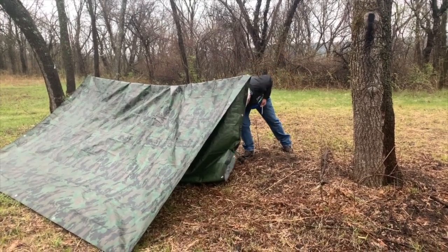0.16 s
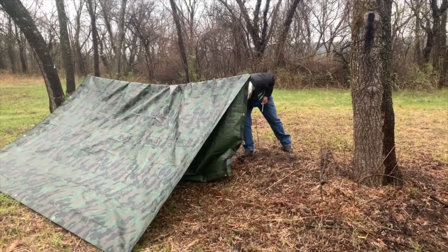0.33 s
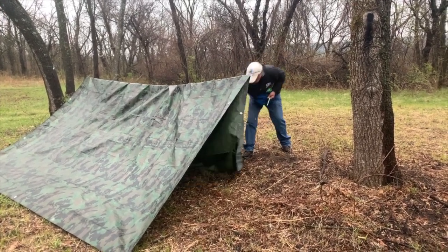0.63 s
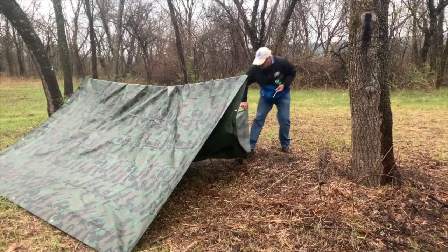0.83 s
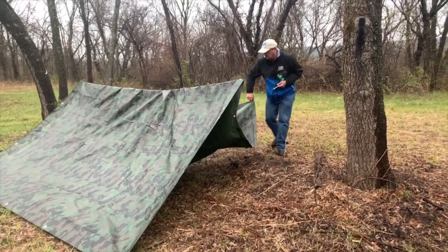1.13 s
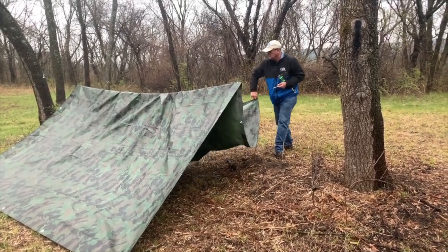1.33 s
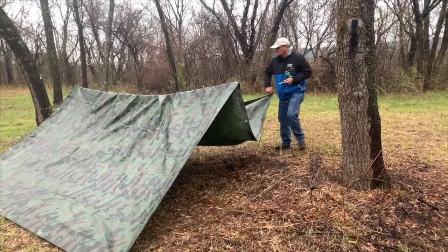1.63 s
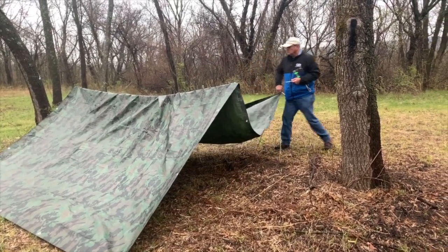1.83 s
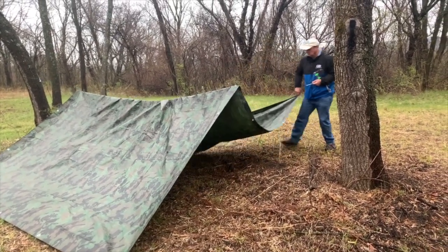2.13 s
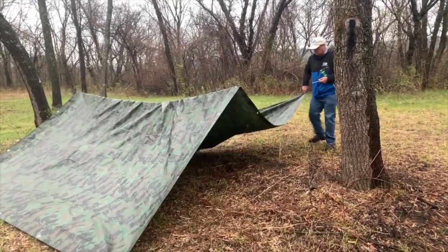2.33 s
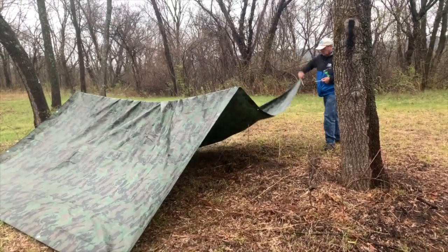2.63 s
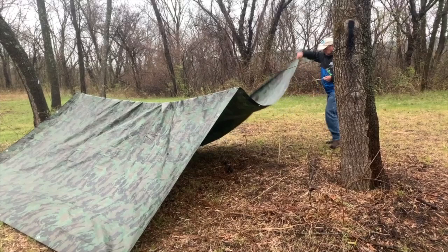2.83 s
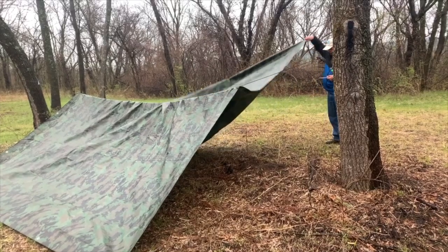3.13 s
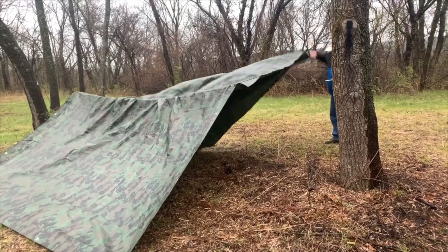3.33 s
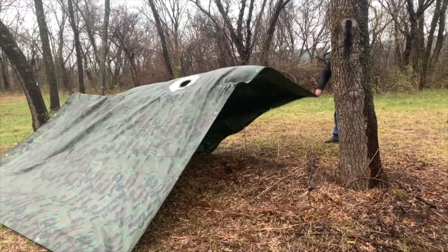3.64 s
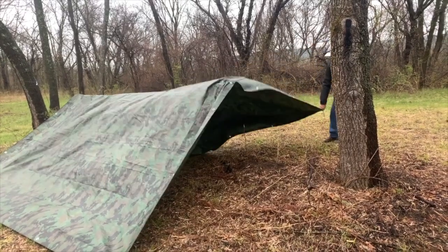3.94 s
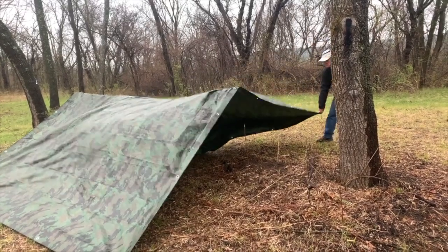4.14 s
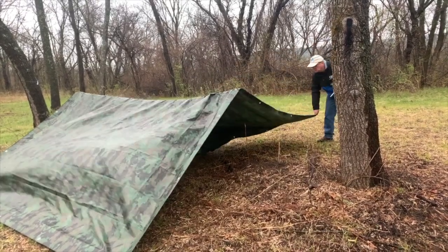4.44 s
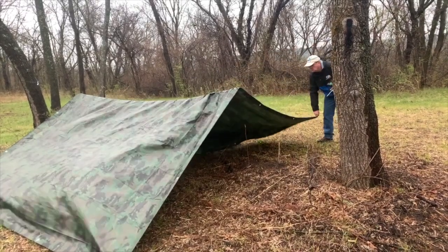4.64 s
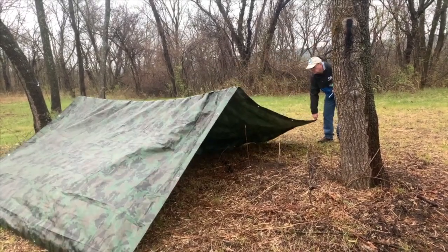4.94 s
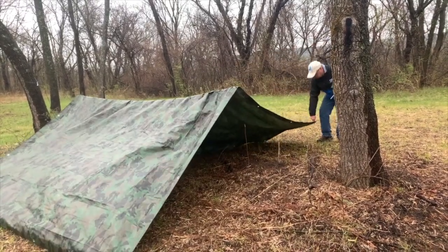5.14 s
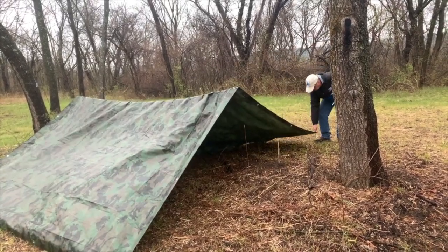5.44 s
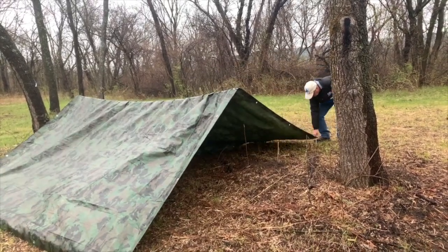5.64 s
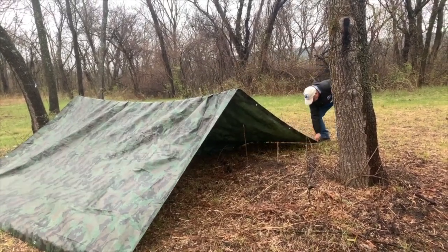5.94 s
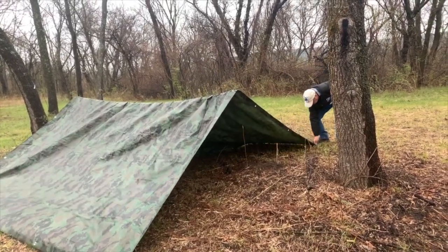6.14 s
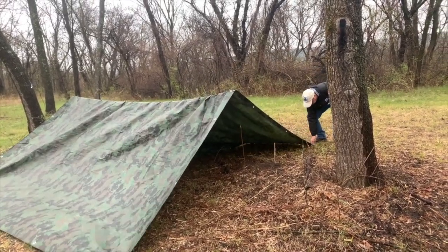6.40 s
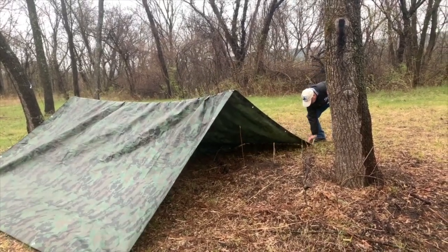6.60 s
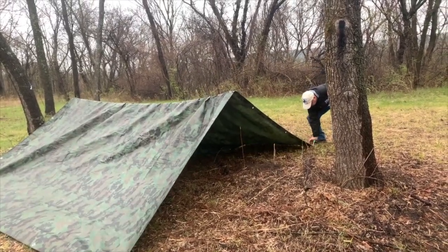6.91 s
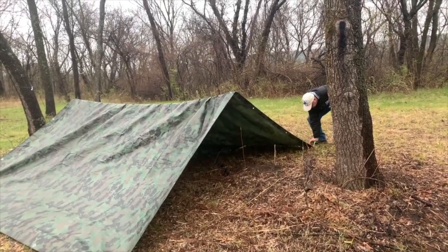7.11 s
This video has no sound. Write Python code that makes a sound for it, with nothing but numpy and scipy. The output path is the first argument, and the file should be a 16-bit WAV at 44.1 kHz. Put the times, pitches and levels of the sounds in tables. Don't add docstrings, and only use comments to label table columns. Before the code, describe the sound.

A woven plastic tarp crinkles and rustles outdoors as it is pulled and shaken, snaps hard once, then settles into faint crackles.

```python
import sys
import numpy as np
from scipy import signal
from scipy.fft import rfft, irfft, next_fast_len
from scipy.io import wavfile
from scipy.ndimage import uniform_filter1d, map_coordinates

SR = 44100
rng = np.random.default_rng(int(sys.argv[2]) if len(sys.argv) > 2 else 0)


def magnitude_from_level(level_db):
    exponent = np.asarray(level_db, float) / 20
    return 10 ** exponent


def unload_wav(signal):
    wavfile.write(
        sys.argv[1],
        SR,
        np.round(np.clip(np.atleast_2d(signal).T, -1, 1) * 32767).astype(np.int16),
    )


N = 320459

# (time [s], crease level [dB])
PULL = [(.09, -66), (.2, -57), (.42, -48), (1.3, -48.5), (1.6, -45.5), (2.27, -46.5), (2.43, -54),
        (2.66, -52), (2.72, -47), (3.2, -47.5), (3.95, -49), (4.3, -45), (4.68, -44.5), (4.8, -52.5),
        (5.26, -64), (6, -60.5), (6.5, -57.5), (7.27, -73.5)]
# (peak time [s], level [dB], rise [s], fall [s])
TUGS = [(.115, 12, 0.01, 0.069), (.255, 11, 0.054, 0.054), (.34, 6, 0.0088, 0.022), (.385, -3, .03, 0.0079),
        (.5, 5, 0.006, 0.09), (.58, 3, 0.022, 0.059), (.73, 4, 0.024, 0.1), (.89, 4, 0.016, 0.23),
        (1.23, -3.5, 0.079, 0.058), (1.38, 3, 0.012, 0.24), (1.88, -3, 0.2, 0.084), (2.0, 6, 0.086, 0.055),
        (2.33, 3, 0.038, 0.043), (2.47, 5, 0.03, 0.15), (3.27, 3, 0.038, 0.087), (3.38, 6, 0.16, 0.09),
        (3.48, 3, 0.03, 0.034), (3.575, 3, 0.022, .015), (3.535, 12.5, 0.18, 0.1),
        (3.79, 2.5, 0.049, 0.046), (4.17, 4.5, 0.11, 0.26), (4.71, 6, 0.041, 0.08),
        (4.918, 6, 0.0024, 0.0092), (4.905, -2.5, 0.023, 0.0057), (5.467, 5, 0.049, 0.075),
        (5.458, -2.5, 0.017, 0.0062), (5.7, 5.5, 0.34, 0.26), (6.15, 7, 0.037, 0.19),
        (6.29, 5, 0.076, 0.051), (6.36, 11.5, 0.1, 0.11), (6.33, 3.5, 0.032, 0.026),
        (6.385, 5, 0.042, 0.038), (6.47, 2, 0.045, 0.044), (6.79, -5.5, 0.27, 0.23),
        (6.75, 4.5, 0.058, 0.063), (6.85, 3.5, 0.04, 0.024), (6.975, 2, 0.077, 0.052)]
# (peak time [s], level [dB], rise [s], fall [s])
SLIDES = [(.08, 5.5, .03, 0.098), (.19, 5.5, 0.083, 0.049), (.25, 2.5, .03, 0.043), (.34, 1, .02, 0.051),
          (.68, -1.5, 0.045, .05), (1.76, -5, 0.12, 0.093), (2.45, 2, 0.052, 0.091),
          (2.88, -2, 0.031, 0.039), (3.26, -4.5, 0.27, 0.056), (3.37, 6, 0.063, 0.12),
          (3.5, 7.5, 0.08, 0.14), (4.6, 1, 0.053, 0.087), (4.75, 7, 0.053, 0.052), (4.88, 2, 0.052, 0.024),
          (5.57, -4, 0.051, 0.046), (6.28, 0.5, 0.057, 0.051), (6.37, 3, 0.043, 0.045),
          (6.45, 3, 0.082, 0.049), (6.9, -4, 0.084, 0.035)]
# (time [s], finest creases facing the microphone [dB], large loose panels [dB],
# taut ridge [dB])
FACING = [(0, 8, 1, 2), (.7, 2, -3, 0), (1.3, 4, -4, 0.5), (1.7, -0.5, -3, 0.5), (2.2, 0.8, 0, 4),
          (3, -1, 0, 2), (3.5, -2, 3, 2), (3.9, -0.5, 2.5, 0.5), (4.2, -1.5, 1.5, 0), (4.6, -4, -4, -2),
          (4.9, -3, 0.5, .1), (5.3, 1.5, 1, -2), (6, 4, 1.5, -2.5), (6.4, 3, -4, -5.5),
          (6.8, -3.5, 4.5, 1.5), (7.27, -3, 6, -1)]
# (centre [Hz], t60 [s], scatter of its own size [dB], trim [dB])
CREASE_SIZES = [
    (273.3, 0.044, 4.5, 0),
    (713, 0.033, 8, 1),
    (1150, 0.0064, 3, -1),
    (1906, 0.035, 6, 0.5),
    (4150, 0.0092, 3.5, 0),
    (7590, 0.029, 4, 2),
    (10730, 0.02, 6, 0),
]
# (level [dB], share of a tug missed [0-1], share of facing, share of looseness, share of sliding)
DRUM = (-7, 0.65, 0.19, 0, 0.42)
CRISP = (-11.5, 0.42, 0.24, -0.35, 1.38)
FIZZ = (-13, 0.45, .5, 0.07, 1.14)
# (frequency [Hz], density [dB per Hz])
SHEET = [(76, -33), (130, -1.5), (266, -1), (470, -11.5), (696, -4), (797, -4), (1450, -3), (1770, -2),
         (2140, -4.5), (2920, -13), (3300, -48), (4290, -47), (7260, -120)]
# (frequency [Hz], density [dB per Hz])
BRIGHT = [(1590, -30), (2700, 5), (3130, -5), (4750, -1.5), (6080, -13.5), (7430, -5.5), (9090, -12.5),
          (10900, -6.5), (12100, -13), (13300, -16), (15200, -18.5), (16000, -30)]
# (time [s], peak [dB],
# panel body re peak [dB], thin tick re peak [dB])
SHAKEN = [(0.0456, -44.5, 2, -5), (0.393, -41.5, 9, -5), (.4539, -33, -17, -23), (0.4965, -36, -3, -15),
          (0.9017, -36, -12, -24), (0.985, -30, -13, -31), (1.293, -42.5, 13, -2), (1.318, -42, -14, 2),
          (1.491, -35, 0, -15), (2.208, -31, -5, -20), (2.329, -33, -14, -15), (2.647, -50, 9, 2),
          (2.6721, -33.5, 2, -15), (2.7082, -32.5, -2, -11), (2.892, -36, 6.5, -10), (3.042, -32, -7, -25),
          (3.161, -36, 3, -12), (3.364, -33, 5, -7), (3.4971, -27, 1, -22), (3.738, -34, -10, -13),
          (4.133, -31, -9, -18), (4.326, -34, -15.5, -3), (4.492, -37, -16, -8), (4.4999, -38, -12, -3),
          (4.512, -44, -11, 0), (4.565, -33, 0, -14), (4.6659, -34, 0, -16), (4.702, -33, 6, -21),
          (4.7255, -22, 0, -19), (4.775, -35, 1, -10)]
PEGGED = [(4.863, -39.5, 2, -19.5), (4.9158, -45.5, -7, 0), (5.008, -49.5, -8, 1), (5.0258, -43, 0, -14),
          (5.0943, -56, -5, -7), (5.1147, -51.5, 5, -6), (5.3707, -51, 5, -12), (5.436, -48, 8, -20),
          (5.4652, -50, 2, -15), (5.4983, -47.5, 8, -20), (5.6173, -41, -10, -22), (5.644, -43, 4, -13),
          (5.6831, -36, -5, -12), (5.6998, -38.5, 3.5, -14), (5.891, -45, -14, -9), (5.9454, -43, 3, -12),
          (6.02, -51, 0, -13), (6.0965, -43, -8.5, -15), (6.111, -46, -10, -9), (6.1389, -40, 4, -7),
          (6.1909, -42, 5, -12), (6.23, -47, 4, -14), (6.3512, -42, 0, -6), (6.519, -47, -9, -12),
          (6.537, -39, -6, -22), (6.5895, -53, -4, -13), (6.6422, -41.5, -10, -26), (6.7436, -49, 0, -10),
          (6.9523, -49, -13.5, -11), (7.047, -54.5, 5.5, -10)]
FURTHER_SNAPS = [(0.11, -52, 1, -8), (0.335, -41, 6, -15), (1.373, -45, -8, 1), (2.141, -40.5, 8, -16),
                 (4.421, -37, -8, -16), (4.545, -46, -10, -16), (4.58, -30, -6, -14), (4.63, -42, -6, -15),
                 (4.75, -34.5, 4, -18), (5.0539, -48, 2, -15), (6.0648, -53, 0, -14), (6.834, -55, 6, -10),
                 (6.917, -54, 3, -10), (6.975, -48.5, 3.5, -16), (7.21, -54, -3, -10), (2.927, -39, -4, -10),
                 (3.059, -42, -8, -10), (3.2004, -43, -6, -4), (3.2606, -40, 4, -8), (4.453, -41, -8, -4),
                 (4.5205, -48, -8, -6)]
# (time [s], peak [dB], pitch [Hz])
KNOCKS = [(.108, -45, 2060), (.249, -27, 1350), (.336, -30.5, 2000), (.392, -30, 1850), (.4985, -28, 1320),
          (.717, -33, 1250), (.4985, -35, 1004), (1.116, -30, 1960), (1.154, -34, 1150), (1.234, -30, 1690),
          (1.373, -31, 2070), (1.989, -33, 1210), (4.732, -20, 1550), (2.244, -33, 1870),
          (2.454, -46, 1793), (3.739, -34, 1150), (3.759, -35, 1994), (4.467, -30, 1634),
          (4.701, -32, 1750), (4.709, -24, 1760), (4.721, -24, 1643), (4.728, -30, 1600),
          (4.917, -31.5, 1720), (6.14, -34, 2180), (6.191, -30.5, 1380), (6.357, -25, 1680),
          (6.465, -33.5, 1512), (6.744, -44, 1460), (6.834, -46, 1455), (6.975, -48, 1796)]
# (time [s], peak [dB], pitch [Hz])
BOOMS = [(3.279, -39, 660), (3.307, -37, 713), (3.332, -35, 788), (3.412, -35, 639), (3.476, -30, 1696),
         (3.482, -26.5, 694), (3.521, -26, 1800), (3.522, -34, 760), (3.535, -36, 696), (3.553, -27, 670),
         (3.568, -29, 735), (3.573, -31, 1640), (3.444, -29, 1890), (2.141, -30.5, 1094)]
# (time [s], peak [dB], pitch [Hz], ring [cycles])
WHUMPS = [
    (3.545, -32, 255, 5),
    (3.581, -41, 62, 6),
    (4.7025, -30, 235, 7),
    (4.72, -36, 290, 7),
    (4.709, -38, 400, 8),
    (4.745, -36, 58, 6),
    (6.144, -42, 72, 5),
    (6.194, -43, 90, 3),
    (.339, -40, 90, 4),
]
# (time [s], peak [dB], pitch [Hz])
FLICKS = [(0.0064, -58, 11100), (0.0458, -44, 5300), (0.2488, -45, 10800), (0.3915, -42, 5640),
          (1.2923, -33, 9830), (1.641, -38, 7570), (1.9589, -44, 7300), (2.209, -35, 8870),
          (2.5207, -40, 7340), (2.672, -34, 11000), (2.7096, -39, 7670), (2.823, -46, 7400),
          (2.8584, -44, 7310), (2.8913, -37, 11360), (2.9572, -51, 7380), (3.3513, -34, 7070),
          (3.4043, -32, 7450), (4.1023, -51, 5580), (4.115, -44, 5520), (4.3031, -35, 7660),
          (4.3266, -34, 7500), (4.4533, -40, 7120), (4.501, -27, 7500), (4.5136, -40, 7900),
          (4.574, -28, 7380), (4.581, -34, 7590), (4.6137, -45, 7720), (4.6259, -34, 7400),
          (4.6794, -35, 8110), (4.7255, -30, 8030), (4.8053, -41, 7780), (4.8363, -53, 7400),
          (4.9024, -58, 5370), (4.9157, -43, 10950), (4.9938, -57, 7570), (5.228, -61, 7380),
          (5.391, -53, 7560), (5.4873, -52, 7050), (5.5992, -56, 7440), (5.7563, -55, 5250),
          (5.8092, -55, 7540), (5.8474, -46, 7750), (6.0348, -51, 7150), (6.096, -51, 7340),
          (6.1384, -41, 8100), (6.1617, -51, 7930), (6.1898, -51, 8070), (6.2114, -48, 7520),
          (6.2811, -49, 7460), (6.3024, -50, 8400), (6.4074, -44, 7630), (6.4793, -45, 8190),
          (6.4971, -54, 8680), (6.5196, -51, 5420), (6.5906, -46, 11160), (5.466, -47, 7500)]
# (time [s], peak [dB], pitch [Hz])
DENTS = [(0.4539, -49, 2660), (0.9018, -42, 4500), (0.985, -39, 2680), (2.33, -35.5, 4330),
         (2.824, -41, 4800), (3.043, -39, 2700), (4.4923, -36, 2748), (4.564, -35, 2580),
         (4.8635, -53, 4766), (5.026, -48, 3093), (5.0544, -51, 2690), (5.1158, -58, 2653),
         (5.227, -58, 4284), (5.37, -58, 4160), (5.437, -59, 2600), (5.4959, -56, 3050),
         (5.6173, -50, 4400), (5.683, -47, 2606), (5.7562, -60, 2570), (5.891, -50, 4520),
         (6.0654, -56, 4466), (6.096, -54, 3560), (6.112, -50, 3890), (6.1384, -38.5, 4270),
         (6.19, -44, 4060), (6.2101, -47, 3507), (6.3063, -49, 2627), (6.3562, -38, 4150),
         (6.3742, -40, 2636), (6.4074, -48, 4360), (6.5385, -51, 3880), (6.6421, -64, 2668),
         (6.9533, -54, 4360)]
SPECK_HZ = [3300, 4360, 4800, 7400, 8300, 10800]
# (frequency [Hz], change of colour [dB])
FOLDED = [(1200, 1.5), (1600, -3.5), (2000, 1.5), (4700, -0.5), (5700, 4), (7000, -0.5)]
LIFTED = [(250, 1), (360, 1.5), (480, -2), (700, 3), (1300, 2), (1550, -3.5), (1900, 2.5), (2300, -1),
          (2800, -1), (3300, 0.5)]
LOWERED = [(5000, 0.5), (6100, -1), (7300, 4), (8700, 6.5), (10000, 3), (11000, -1.5), (12200, 2),
           (13300, 7), (15500, 3)]
# (time [s], folded [0-1], lifted [0-1], lowered [0-1])
POSTURE = [(0, 1, 0.1, 0), (.6, 0.7, 0.25, 0.2), (1.2, 0.22, 1, 0.1), (2, 0, 0.86, 0.01),
           (3.1, 0.1, 0.92, 0), (3.5, 0.02, 0.19, 0), (4.8, 0.06, 0, 0.13), (5.6, 0, 0.38, 0.36),
           (6.1, 0, 0, 1), (6.5, 0, 0, 0.88), (7.27, 0, 0, 0.54)]
# (peak time [s], level [dB], rise [s], fall [s])
GUSTS = [(.05, 9, 0.2, 0.14), (.34, 3, 0.066, 0.22), (2.2, 2.5, 1.8, 0.037), (3.58, 7, 0.29, 0.23),
         (4.31, 12.5, 0.83, 0.17), (4.74, 13, 0.19, 0.13), (5.14, 4, 0.2, 0.091), (5.36, -3, 0.23, 0.095),
         (5.63, 13, 0.12, 0.18), (5.97, -8, 0.11, 0.12), (6.17, 8, 0.17, 0.096)]
# (peak time [s], level [dB], rise [s], fall [s])
TRAFFIC = [
    (5.65, 0.5, 0.57, 0.38),
    (6.9, 1.5, 0.43, 0.52),
]
# (frequency [Hz], density [dB per Hz])
BUFFET = [(11, -51), (18, -5.5), (38, 2.5), (65, 0.5), (84, -29), (140, -120)]
RUMBLE = [(32, -29), (55, -3), (81, -1), (107, -7.5), (133, -7), (178, -20), (200, -14), (260, -28),
          (440, -120)]
WOOD = [(88, -27), (150, -3), (190, -16), (315, -12), (524, -21.5), (837, -35.5), (1290, -24.5),
        (1720, -35), (2920, -39.5), (6020, -51), (7470, -42), (13700, -68), (16000, -51)]

BRIGHT_DB = -10
FLAP_DB, FLAP_RISE_S, FLAP_FALL_S = 40.5, 0.027, 0.098
STRAYS_PER_S, STRAY_DB, STRAY_SCATTER_DB, STRAY_COLOUR_DB = 30, 3, 3.5, 5
SPECKS_PER_S, SPECK_DB, SPECK_SCATTER_DB = 60, -3, 1
TICK_TILT_DB, TICK_LEAN, TICK_USUAL_DB = 1.5, .25, -4
BUFFET_DB, RUMBLE_DB, WOOD_DB = -57, -54, -63
RUMBLE_SHARE = 0.16
TOP_HZ = 15830


def creases(rate, thinning, spread_db, biggest_db, clump_db, hiss_db):
    crease_db, drum_db, crisp_db, fizz_db = handling()
    busy = np.clip(magnitude_from_level(thinning * (crease_db + 47)), .05, 3)
    draws = rng.random((30000, 2))
    own = np.clip(rng.standard_normal((len(draws), len(CREASE_SIZES))), -2, 2)
    expected = np.cumsum(rate * busy / SR)
    at = np.searchsorted(expected, np.cumsum(-np.log(draws[:, 0])))
    live = at < N
    size_db = biggest_db * np.tanh(-spread_db * np.log(draws[:, 1]) / biggest_db)
    gaps = 1 + 2.0 * np.clip(1 - busy, 0, 1)
    clumps = clump_db * (wobble(23) + wobble(45)) * gaps

    layers = []
    for k, (hz, t60, own_db, trim_db) in enumerate(CREASE_SIZES):
        sharp = np.clip(np.log(hz / 150) / 4, 0, 1)
        event_db = sharp * size_db + own_db * own[:, k]
        power = np.bincount(at[live], magnitude_from_level(2 * event_db)[live], N)
        swell = dying(power, t60 / 2) / busy
        swell = np.sqrt(swell / swell.mean() + magnitude_from_level(2 * hiss_db))
        swell = swell * magnitude_from_level(sharp * clumps + 0.59 * wobble(30))
        bursts = steady(swell, 0.16) * rng.standard_normal(N)
        layers.append(magnitude_from_level(trim_db) * coloured(bursts, slice_db(k)))

    finest_db, loose_db, taut_db = curves(FACING)
    layers[1] = layers[1] * magnitude_from_level(loose_db)
    layers[3] = layers[3] * magnitude_from_level(taut_db)
    layers[6] = layers[6] * magnitude_from_level(finest_db)
    drum = steady(layers[0], .3)
    body = steady(sum(layers[1:4]), .3)
    crisp = steady(layers[4], .3)
    fizz = steady(sum(layers[5:7]), .3)
    mix = body + magnitude_from_level(drum_db) * drum + magnitude_from_level(crisp_db - 1.1) * crisp + magnitude_from_level(fizz_db - 0.74) * fizz
    return magnitude_from_level(crease_db - 0.65) * mix


def handling():
    pull_db, = curves(PULL)
    tug_db = swells(TUGS)
    slide_db = swells(SLIDES)
    finest_db, loose_db, _ = curves(FACING)
    flaps = [(s, max(db + FLAP_DB, 0), FLAP_RISE_S, FLAP_FALL_S) for s, db, *_ in WHUMPS]

    def relative(db, missed, facing, loose, slide):
        return db - missed * tug_db + facing * finest_db + loose * loose_db + slide * slide_db

    drum_db = relative(*DRUM) + 0.85 * swells(flaps)
    return pull_db + tug_db, drum_db, relative(*CRISP), relative(*FIZZ)


def slice_db(*sizes):
    centres = [row[0] for row in CREASE_SIZES]
    chosen = np.isin(np.arange(len(centres)), sizes) * 1.

    def gain_db(hz):
        whole = np.where(hz < 3000, along(SHEET, hz), along(BRIGHT, hz) + BRIGHT_DB)
        return whole + 10 * np.log10(along(list(zip(centres, chosen)), hz) + 1e-7)

    return gain_db


def snaps():
    s, db, body_db, thin_db = np.transpose(SHAKEN + PEGGED + FURTHER_SNAPS + strays())
    t = np.arange(SR // 50) / SR
    starts = np.round((s + 0.001029) * SR).astype(int)
    rows = (starts[:, None] + np.arange(len(t))).ravel()
    noise = np.sign(rng.standard_normal((len(s), 3, len(t))))

    def lay(part, level_db, t60, rise_s=.0001):
        shape = magnitude_from_level(level_db[:, None] - 60 * t / t60) * (1 - np.exp(-t / rise_s))
        return np.bincount(rows, (shape * noise[:, part]).ravel(), N + SR)[:N]

    tilt_db = TICK_TILT_DB * np.clip(rng.standard_normal(len(s)), -2, 2)
    tilt_db = tilt_db + TICK_LEAN * (thin_db - TICK_USUAL_DB)
    low_tick = coloured(lay(0, db + thin_db - 0.59 * tilt_db, t60=0.0061), slice_db(5))
    high_tick = coloured(lay(0, db + thin_db + tilt_db, t60=0.0061), slice_db(6))
    crack = coloured(lay(1, db, t60=0.0029), slice_db(4))
    panel = coloured(lay(2, db + body_db, t60=0.025, rise_s=0.00067), slice_db(2, 3))
    return magnitude_from_level(26.0) * (low_tick + high_tick) + magnitude_from_level(17.0) * crack + magnitude_from_level(8.5) * panel


def strays():
    s = np.cumsum(rng.exponential(size=400)) / STRAYS_PER_S
    size, body, thin = rng.standard_normal((3, len(s)))
    crease_db = handling()[0][np.minimum(s * SR, N - 1).astype(int)]
    db = crease_db + STRAY_DB + STRAY_SCATTER_DB * np.minimum(size, 1)
    body_db = -5.5 + STRAY_COLOUR_DB * body
    thin_db = -15.0 + STRAY_COLOUR_DB * np.minimum(thin, 1)
    return np.transpose([s, db, body_db, thin_db])[s < N / SR - .03].tolist()


def rings(events, cycles, gain_db):
    out, t = np.zeros(N + SR), np.arange(SR // 12) / SR
    for (s, db, hz, *_), life in zip(events, np.broadcast_to(cycles, len(events))):
        phase = 2 * np.pi * hz * t + 0.034 * np.cumsum(rng.standard_normal(len(t)))
        rise = 1 - np.exp(-t * max(hz / 1.9, 600))
        fall = magnitude_from_level(db + gain_db - 60 * t * hz / life)
        out[round(s * SR):][:len(t)] += fall * rise * np.sin(phase)
    return out[:N]


def specks():
    s = np.cumsum(rng.exponential(size=500)) / SPECKS_PER_S
    size, tune = rng.standard_normal((2, len(s)))
    crease_db = handling()[0][np.minimum(s * SR, N - 1).astype(int)]
    db = crease_db + SPECK_DB + SPECK_SCATTER_DB * size
    hz = rng.choice(SPECK_HZ, size=len(s)) * np.exp(.06 * tune)
    return np.transpose([s, db, hz])[s < N / SR].tolist()


def ground(x):
    shares = np.clip(curves(POSTURE), 0, 1)
    for share, change in zip(shares, (FOLDED, LIFTED, LOWERED)):
        x = x + share * (coloured(x, lambda hz: along(change, hz)) - x)
    return x


def trees(x):
    t = np.arange(SR // 5) / SR
    tail = rng.standard_normal(len(t)) * magnitude_from_level(-60 * t / 0.011)
    return signal.fftconvolve(np.pad(x, (130, 0)), tail / np.linalg.norm(tail))[:N]


def air():
    gust_db = swells(GUSTS)
    buffet_db = BUFFET_DB + gust_db
    rumble_db = RUMBLE_DB + RUMBLE_SHARE * gust_db + swells(TRAFFIC)
    noise = rng.standard_normal((3, N + SR // 2))
    buffet = coloured(noise[0], lambda hz: along(BUFFET, hz))[-N:]
    buffet = unit(magnitude_from_level(0.54 * wobble(3.33)) * buffet)
    rumble = unit(coloured(noise[1], lambda hz: along(RUMBLE, hz))[-N:])
    wood = unit(coloured(noise[2], lambda hz: along(WOOD, hz))[-N:])
    return magnitude_from_level(buffet_db) * buffet + magnitude_from_level(rumble_db) * rumble + magnitude_from_level(WOOD_DB) * wood


def unit(x):
    return x / np.sqrt(np.mean(x ** 2) + 1e-20)


def steady(x, seconds):
    return x / np.sqrt(np.abs(uniform_filter1d(x ** 2, int(seconds * SR))) + 1e-20)


def along(points, hz):
    f, v = np.transpose(points)
    return np.interp(np.log(hz + 1), np.log(f + 1), v)


def curves(rows):
    s, *cols = np.transpose(rows)
    return [np.interp(np.arange(N) / SR, s, c) for c in cols]


def swells(rows):
    t = np.arange(N) / SR
    return sum(np.interp(t, [s - rise, s, s + fall], [0, db, 0]) for s, db, rise, fall in rows)


def wobble(rate):
    knots = rng.standard_normal(int(N * rate / SR) + 4)
    return map_coordinates(knots, [np.arange(N) * rate / SR])


def coloured(x, db_of_hz):
    m = 2 ** 14
    gain = np.maximum(magnitude_from_level(db_of_hz(np.fft.rfftfreq(m, 1 / SR))), 1e-6)
    cep = irfft(np.log(gain), m)
    cep[1:m // 2] *= 2
    cep[m // 2 + 1:] = 0
    return signal.oaconvolve(x, irfft(np.exp(rfft(cep)), m))[:len(x)]


def dying(spikes, t60):
    return signal.lfilter([1], [1, -magnitude_from_level(-60 / (t60 * SR))], spikes)


def scene():
    single = snaps() + rings(KNOCKS + BOOMS, cycles=20.0, gain_db=1.5)
    single = single + rings(FLICKS, cycles=37, gain_db=-2.5)
    single = single + rings(DENTS, cycles=29, gain_db=2.5)
    single = single + rings(specks(), cycles=35, gain_db=0.5)
    single = single + rings(WHUMPS, cycles=[row[3] for row in WHUMPS], gain_db=5.0)
    rustle = creases(rate=1300, thinning=.4, spread_db=5, biggest_db=8, clump_db=0.72, hiss_db=-2.5)
    tarp = rustle + single + magnitude_from_level(-9.5) * trees(single)
    return (ground(tarp) + air())[None]


def roll_off(x):
    return signal.sosfilt(signal.butter(12, 16400, fs=SR, output="sos"), x)


def record(dry):
    heard = dry + magnitude_from_level(-81.5) * rng.standard_normal(dry.shape)
    heard = heard / (1 + np.abs(heard / .07) ** 4) ** .25
    m = next_fast_len(N + SR // 10)
    passed = np.fft.rfftfreq(m, 1 / SR) < TOP_HZ
    mix = irfft(rfft(heard, m) * passed, m)[:, :N]
    return roll_off(mix)


dry = scene()
out = record(dry)
unload_wav(out)
```